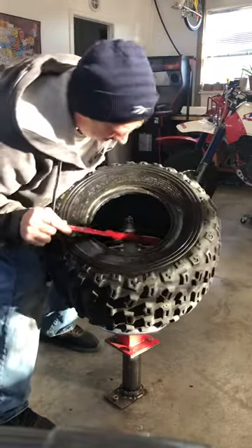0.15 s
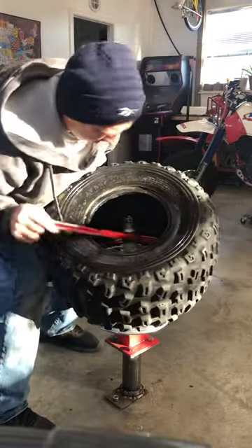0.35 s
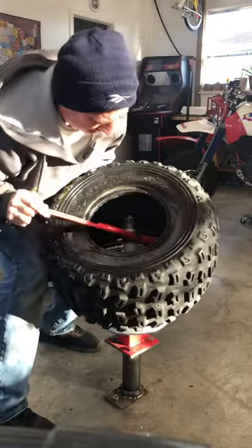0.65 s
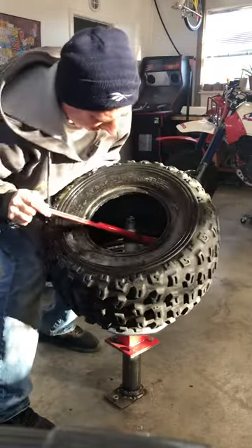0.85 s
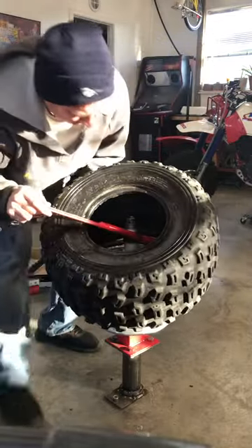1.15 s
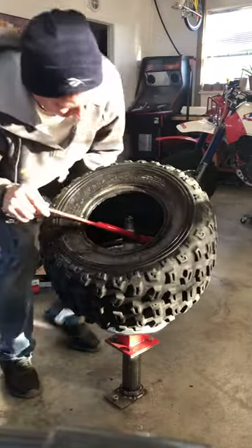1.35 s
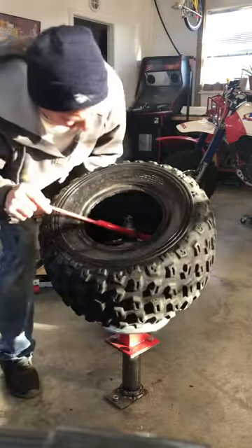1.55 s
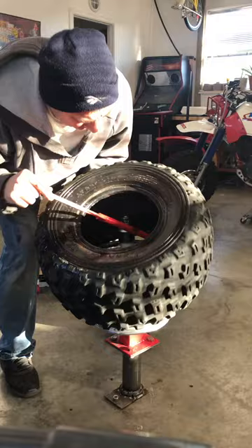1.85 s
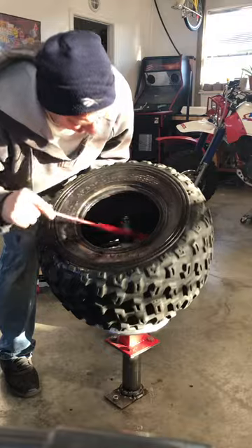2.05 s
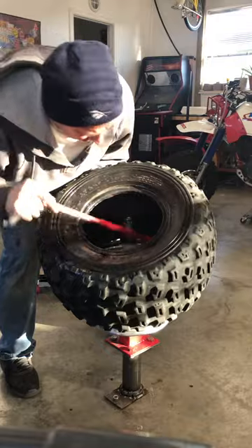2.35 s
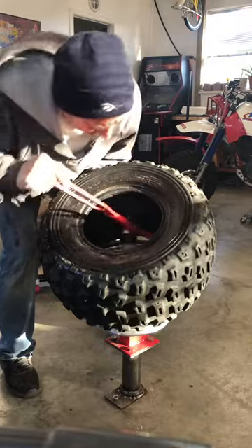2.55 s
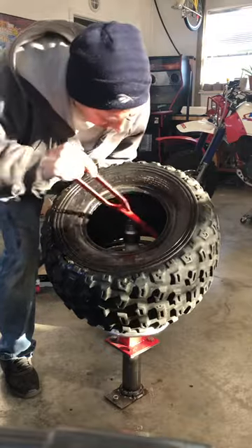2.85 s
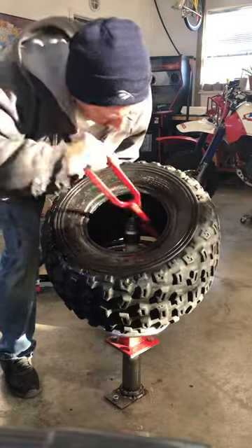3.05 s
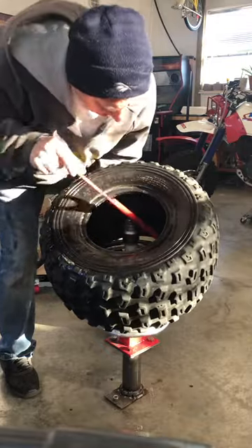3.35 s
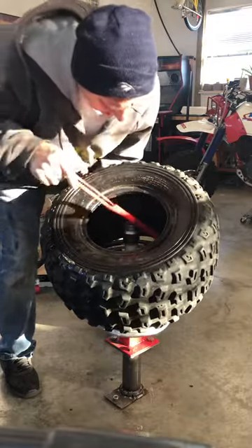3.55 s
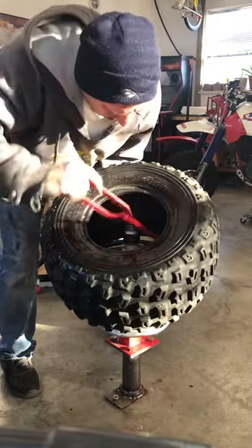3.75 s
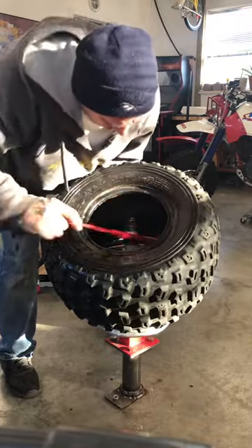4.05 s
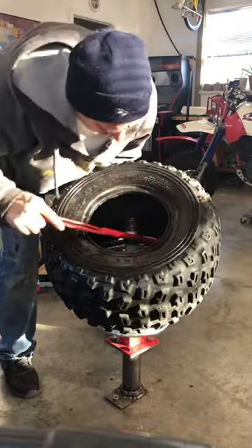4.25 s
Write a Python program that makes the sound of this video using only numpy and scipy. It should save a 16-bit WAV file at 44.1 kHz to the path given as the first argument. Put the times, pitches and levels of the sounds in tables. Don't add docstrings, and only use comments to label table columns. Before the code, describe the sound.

A bar scrapes and rumbles over thick rubber, then dull knocks lead to two hard metallic clangs on a wheel rim in a quiet garage.

```python
import sys
import numpy as np
from scipy import signal
from scipy.fft import rfft, irfft, next_fast_len
from scipy.io import wavfile
from scipy.ndimage import uniform_filter1d

SR = 44100
rng = np.random.default_rng(int(sys.argv[2]) if len(sys.argv) > 2 else 0)


def voltage_ratio(decibels):
    exponent = np.asarray(decibels, float) / 20
    return 10 ** exponent


def to_wav(s):
    ch = np.atleast_2d(s).T
    pcm = np.round(np.clip(ch, -1, 1) * 32767)
    wavfile.write(sys.argv[1], SR, pcm.astype(np.int16))


N = 194920

# (multiple of the shaft rate [1], level [dB rms])
MOTOR_ORDERS = [(1, -59.5), (2, -58), (3, -63.5), (4, -53.5), (5, -76.5)]
SHAFT_HZ = 67.06
# (frequency [Hz], density [dB per Hz])
AIR_SPECTRUM = [(22, -32), (65, -7), (142, -4), (330, -12.5), (640, -22.5), (980, -22.5), (2080, -32),
                (16400, -47)]
AIR_DB = -57
# (frequency [Hz], decay time t60 [s])
GARAGE_DECAY = [(200, 0.23), (1000, 0.31), (3000, 0.54), (8000, 0.22), (16000, .2)]
ROOM_DB = -28

# (frequency [Hz], density [dB per Hz])
CLOTH_SPECTRUM = [(3530, -14.5), (4800, -3), (6530, -8), (7600, -9), (9500, -6), (11400, -7.5), (15200, -8),
                  (16400, -3.5)]
# (time of the peak [s], half length [s], level [dB])
ARM_MOVES = [(.05, 0.18, -69), (.3, 0.13, -59.5), (.42, .15, -57.5), (.6, 0.1, -65.5), (.745, 0.045, -66.5),
             (.86, 0.036, -66), (.915, 0.037, -61), (1.035, 0.046, -52.5), (1.098, 0.037, -43.5),
             (1.135, .02, -54), (1.172, 0.026, -51.5), (1.25, 0.067, -64.5), (1.335, 0.038, -60),
             (1.47, 0.054, -68), (2.02, .06, -72.5), (2.16, 0.16, -67), (2.35, .08, -71), (2.5, .1, -65.5),
             (3.2, .2, -75), (3.348, 0.016, -64), (3.6, 0.048, -73), (4.12, 0.079, -67.5),
             (4.3, 0.17, -68.5)]
# (time [s], level [dB], decay time t60 [s])
SEAM_SNAPS = [
    (0.739, -42, 0.014),
    (1.976, -61, 0.49),
    (2.14, -61, .1),
]
RISE_SHARE = 0.55
SKIRT = 1.3

# (frequency [Hz], density [dB per Hz])
SCRAPE_SPECTRUM = [(180, -23), (320, -10), (512, -7), (676, -23.5), (839, -10.5), (1430, -16.5),
                   (1930, -12), (5000, -38.5)]
HISS_SPECTRUM = [(1410, -44.5), (2400, -1), (3080, -7), (4060, -2.5), (5380, -8.5), (7060, -15), (9000, -6),
                 (12500, -32.5)]
# (time of the peak [s], half length [s], scrape level [dB], hiss over scrape [dB])
RUBBER_STROKES = [(0, 0.07, -57, -25), (0.19, 0.1, -79, 12), (0.266, 0.014, -49.5, -9),
                  (0.306, 0.041, -47, -5), (0.408, 0.12, -59, -2), (0.576, 0.15, -57.5, -4),
                  (0.753, 0.03, -65.5, 6.5), (0.84, 0.031, -63, 1.5), (0.912, 0.042, -60, 5.5),
                  (1.024, 0.052, -60, 3.5), (1.103, 0.045, -56.5, 5), (1.164, 0.026, -61, 13),
                  (1.217, 0.06, -56.5, 0), (1.322, 0.068, -63.5, 0.5), (1.454, 0.094, -62.5, -1),
                  (1.998, 0.051, -69, 3.5), (2.156, 0.092, -63.5, -1), (2.286, 0.032, -64.5, -3)]
# (time of the peak [s], half length [s], level [dB])
WALL_LEANS = [
    (0, 0.065, -33),
    (.09, 0.022, -39.5),
    (.178, 0.036, -46.5),
    (.277, 0.011, -37),
    (.325, 0.029, -35.5),
    (.47, 0.1, -49.5),
    (.61, 0.12, -48),
    (1.215, 0.028, -51),
    (1.93, 0.022, -52),
    (2.27, .02, -54),
]
# (time of the centre [s], half length [s], frequency [Hz], width [Hz], level [dB rms])
RUBBED_MODES = [(0.309, 0.046, 1950, 74, -52), (0.335, 0.036, 680, 22, -61),
                (0.293, 0.031, 3000, 73, -53.5), (0.33, 0.044, 3500, 240, -66),
                (0.42, 0.096, 5000, 390, -59.5), (0.537, 0.037, 1800, 35, -58), (0.57, 0.072, 853, 72, -58),
                (0.5, 0.12, 2300, 50, -85), (0.555, 0.042, 2700, 45, -63), (0.567, 0.066, 1600, 22, -62.5),
                (0.284, .025, 5780, 90, -56), (0.6, 0.09, 5700, 100, -67.5), (0.324, 0.026, 1200, 60, -57),
                (.315, 0.011, 970, 51, -59), (0.513, 0.017, 515, 44, -55.5),
                (1.025, 0.024, 1880, 320, -57.5), (1.04, .025, 7100, 1500, -53),
                (1.105, 0.02, 4500, 970, -50), (1.175, 0.016, 4540, 950, -46.5),
                (.03, 0.035, 5500, 130, -58), (0.065, .025, 3690, 80, -66), (0.057, .03, 4720, 37, -61.5),
                (.05, 0.068, 2830, 37, -65), (0.57, .07, 4800, 64, -67), (0.314, .02, 6950, 40, -58),
                (0.305, 0.045, 3750, 41, -60), (0.46, .05, 4670, 60, -62), (.45, .05, 7680, 50, -68),
                (1.1, .02, 3400, 130, -60), (1.095, 0.014, 6000, 60, -49), (1.17, .025, 4000, 70, -55),
                (1.17, 0.017, 1960, 70, -55.5), (.84, .01, 1000, 80, -61)]

# (time [s], peak level [dB], dull part [dB], sharp part [dB], bright part [dB])
SMALL_CONTACTS = [(0.2586, -43, -3.5, -9, -18), (1.438, -32, -14, -20, -11.5), (1.7055, -55.5, -25, 15, -7),
                  (1.7156, -47, 4.5, -14, -30), (1.7892, -52, -3, -11, -28.5), (1.8933, -51, -8, -10, -27),
                  (2.6562, -57, -1, -21, -20.5), (2.9042, -51.5, -15.5, -0.5, 3.5),
                  (3.163, -56.5, -15, 1, 7), (3.2389, -49, -10, -15, -15), (3.271, -37.5, -12, -25, -1),
                  (3.311, -40, -30, -27, -20), (3.36, -40.5, -25, 1.5, 10), (3.679, -49, -33, -7, 9)]
RUBBER_HZ, STEEL_HZ = 1090, 2710

# (frequency [Hz], decay time t60 [s])
BAR_MODES = [(1485, 1.2), (3999, .47)]
# (time [s], level of the low mode [dB], level of the high mode [dB])
BAR_STRIKES = [
    (1.715, -68, -70),
    (2.311, -45.5, -37.5),
    (3.362, -60.5, -69),
    (3.678, -85, -71),
    (4.145, -56, -38.5),
]
# (frequency [Hz], level [dB], decay time t60 [s])
TIP_MODES = [(1910, -0.5, 0.21), (2960, -6, 0.37), (3900, -3.5, 0.17), (5360, -24, 0.15), (5630, -4, 0.17),
             (6900, -17, 0.34), (7700, -5, 0.17), (9800, -13, 0.25), (10900, -15, 0.2), (12500, -14, 0.064),
             (14000, -2, 0.075)]
# (time [s], level [dB])
TIP_TICKS = [
    (3.164, -65.5),
    (3.225, -58),
    (3.24, -62),
    (3.272, -55.5),
    (3.361, -50),
    (3.678, -57.5),
]
# (time [s], level [dB], frequency [Hz], decay time t60 [s])
BEAD_PATS = [(1.157, -39, 1090, 0.048), (1.187, -40, 380, .025), (1.421, -44, 1000, 0.018),
             (1.4395, -50, 560, .012), (1.637, -61, 5630, .015), (1.68, -50, 600, .02),
             (1.8965, -46, 1050, .04), (1.899, -58, 1900, .03), (1.707, -49, 7000, .02),
             (1.719, -39, 261, .07), (2.318, -48, 65, .12), (3.272, -50, 6950, .03),
             (3.272, -54, 8500, .03), (4.153, -50, 60, .12), (2.3145, -36, 620, 0.042),
             (3.2235, -42, 686, 0.036), (2.3133, -24.5, 475, .012), (2.652, -54, 1100, 0.047),
             (3.2232, -38, 567, .012), (4.1491, -23, 500, .014)]
# (time [s], level [dB], frequency [Hz], decay time t60 [s])
RIM_PINGS = [(3.361, -49, 3031, .22), (3.361, -51, 1879, .17), (3.361, -58, 6912, .18),
             (3.361, -60, 5733, .3), (3.361, -62, 5636, .3), (3.361, -57, 3779, .15),
             (3.224, -56, 1933, .4), (3.224, -54, 1168, .4), (3.224, -54, 845, .4),
             (1.7156, -53, 5240, .08), (2.314, -54, 4813, .4), (2.314, -50, 7370, .29),
             (2.3145, -35, 7506, .07), (4.1493, -43, 3542, .18), (4.1493, -57, 5030, .45),
             (4.1493, -55, 6955, .34), (4.1493, -57, 6915, .3), (4.1493, -58, 8603, .28),
             (4.1493, -53, 7940, .3), (4.1493, -60, 9400, .25), (4.1493, -44, 2592, .33),
             (4.1493, -46, 3368, .34)]

# (frequency [Hz], level [dB], decay time t60 [s])
HOLLOW_MODES = [(164.2, 7, 0.15), (179, 7, 0.15)]
# (time [s], level [dB], damping [divides the modes' t60], wall thud [dB])
HOLLOW_PUSHES = [
    (1.438, -44.5, 0.59, -63),
    (1.719, -30, 1.27, -26.5),
    (1.785, -39.5, 2, -43),
    (1.845, -47, 0.81, -56),
    (1.905, -48, 0.94, -50),
    (2.316, -37.5, 0.44, -30),
    (2.923, -51, 0.86, -69),
    (3.169, -55, 0.67, -63),
    (3.252, -50.5, 0.91, -42),
    (4.152, -40, 0.59, -38),
]

# (frequency [Hz], level [dB], decay time t60 [s])
EARLIER_TAIL = [(338, 6, 0.45), (527, -1.5, 0.56), (1000, -6, 0.53), (1280, -10, 0.4), (2120, -13, 0.39),
                (2640, -13, 0.57), (3770, -21, 0.68), (4940, -15, 0.61), (5100, -17, 0.64),
                (5900, -19, 0.46), (7350, -31, 0.26)]
EARLIER_DB = -44
# (crack [dB], tail [dB], grit [dB], ring time of the tail modes [s], top set by contact softness [Hz])
BLOWS = [
    (-39.5, -47, -38, 0.019, 2100),
    (-28.5, -47.5, -64, 0.013, 2900),
    (-17, -30, -25.5, 0.024, 14000),
    (-28, -47, -33.5, 0.018, 4500),
    (-22.5, -36.5, -21.5, 0.013, 7140),
]
# (time [s], level [dB])
BLOW_TOUCHES = [
    [(1.4313, -2), (1.4328, 0)],
    [(1.7148, -5), (1.7156, 0)],
    [(2.3099, -7), (2.3115, -5), (2.3131, -8), (2.3141, 0), (2.3156, -9)],
    [(3.2205, -10), (3.2220, -3), (3.2232, 0)],
    [(4.1449, -7), (4.1468, -5), (4.1481, -8), (4.1494, 0), (4.1543, -10)],
]
# (frequency [Hz], level [dB], decay time t60 [s])
KNOCK_CRACKS = [
    [(1055, -1.5, 0.051), (1900, -9, 0.028), (2760, -3, 0.033)],
    [(1060, -6.5, 0.029), (2640, -14, 0.071), (5270, -6, 0.027)],
    [(1294, 0, 0.018), (1875, -4, 0.031), (2760, -12, 0.013), (3870, -20, 0.016), (4300, -19, 0.037),
     (5300, -17, 0.081), (7000, -16, 0.012)],
]
# (frequency [Hz], level [dB], decay time t60 [s])
KNOCK_RINGS = [
    [(590, 2.5, 1.3), (1040, -6.5, 0.65), (1460, -30, 1.2), (1960, -12, 0.37), (2320, -18, 0.45),
     (2700, -11, 0.33), (3800, -19, 0.39)],
    [(404, -1.5, .4), (530, -12, 0.27), (716, -18, .4), (1055, -12.5, 0.54), (1870, -18, .4),
     (2250, -11, 0.38), (2680, -9, 0.42), (3740, -20, 0.4), (4610, -18, .3), (5130, -12, 0.31),
     (6900, -16, 0.17), (8500, -27, 0.1)],
    [(850, 3, 0.24), (1284, 4, 0.38), (1790, -20, 0.5), (1950, -3, 0.65), (2440, -8, 0.16),
     (3930, -9.5, 0.7), (4730, -14, .4), (5160, -18, 0.45), (6950, -8, 0.099)],
]
WHEEL_MODE_HZ = [867, 1222, 1470, 1855, 2030, 2135, 2175, 2277, 2450, 2677, 2840, 3385, 3465, 3780]
WHEEL_LEVELS = [
    [-12.5, -24.5, -21.5, -6.5, -11, -5.5, -11, -30, -24, -13.5, -16, -8, -19.5, -15.5],
    [-12, -12.5, -17, -8, -13, -4, -10, -17.5, -5.5, -4.5, -12, -5.5, -16, -5.5],
]
LEVER_MODE_HZ = [3967, 4000, 4130, 4815, 5453, 5728, 5860, 6920, 7500, 7980, 8600, 9400, 11060]
LEVER_LEVELS = [
    [-12, -19, -9.5, -15, -13.5, -14, -22.5, -12, -13.5, -33, -32.5, -27, -21],
    [-19, -11, -8, -14, -16, -11.5, -14, -22, -29, -10.5, -24, -18, -33],
]
# (frequency [Hz], decay time t60 [s])
CLANG_DECAY = [(800, .6), (2000, 0.45), (4000, 0.47), (5000, 0.28), (12000, 0.28)]
CLANG_CRACK_PITCHES = [
    [890, 1437, 1791, 2147, 2677, 2854, 3379, 3843, 4110, 4820, 5573, 7525],
    [728, 1389, 1911, 2154, 2351, 2592, 3497, 4068, 4793, 5900, 7888, 8595],
]
# (level [dB], decay time t60 [s])
CLANG_CRACK_LEVELS = [
    [(-7.5, 0.014), (-2, 0.011), (1.5, 0.026), (3.5, 0.022), (-6, 0.033), (-10.5, 0.05), (-1.5, 0.065),
     (-4, .05), (-6.5, 0.06), (-16.5, 0.076), (-17, 0.05), (-14, 0.087)],
    [(-3, 0.022), (-4, 0.083), (2.5, 0.01), (-3, 0.1), (-21, 0.021), (-4, 0.093), (-0.5, 0.03), (0, 0.079),
     (-6, 0.023), (-8.5, 0.028), (-8, 0.046), (-3.5, 0.0084)],
]
SINGING_PITCHES = [
    [866, 1852, 2075, 2155, 2175, 2677, 3381, 3831, 3966, 4140, 5453, 6891, 7500],
    [867, 1222, 1836, 1903, 2026, 2174, 2273, 2369, 2453, 2677, 3404, 3763, 5841, 8000],
]
# (level [dB], decay time t60 [s])
SINGING_LEVELS = [
    [(-46.5, 0.51), (-39, .45), (-51.5, 0.72), (-40, .37), (-38, 0.44), (-42.5, .4), (-40.5, 0.25),
     (-49, .43), (-36, .44), (-43, .25), (-52, .37), (-48.5, 0.38), (-42, .2)],
    [(-49, 0.51), (-47, 0.38), (-39.5, 0.34), (-47.5, 0.58), (-42, 0.34), (-39, .33), (-46, .37),
     (-46, 0.39), (-39, 0.34), (-43, .33), (-44, 0.34), (-51, 0.46), (-55, .36), (-55, 0.35)],
]
FILL_DB, FILL_RING_S = -10.5, 0.003
TOP_HZ, LOW_CUT_HZ = 16150, 30


def rms_one(x):
    return x / np.sqrt(np.mean(x ** 2) + 1e-20)


def at_hz(points, hz):
    table = np.array(points)
    return np.interp(np.log(hz), np.log(table[:, 0]), table[:, 1])


def band(x, low_hz, high_hz):
    sos = signal.butter(2, [low_hz, min(high_hz, .45 * SR)], "band", fs=SR, output="sos")
    return signal.sosfilt(sos, x)


def add(out, s, sound):
    at = round(s * SR)
    out[at:at + len(sound)] += sound[:N - at]


def drift(rate_hz):
    r = np.exp(-80 * np.pi * rate_hz / SR)
    white = rng.standard_normal(N // 40 + 2002)
    slow = signal.lfilter([1], [1, -2 * r, r * r], white)[2000:]
    return np.interp(np.arange(N) / 40, np.arange(len(slow)), rms_one(slow))


def swells(rows):
    t, out = np.arange(N) / SR, np.zeros(N)
    for s, half, db in rows:
        length = np.where(t < s, RISE_SHARE * half, half)
        out += voltage_ratio(db) * np.exp(-np.abs((t - s) / length) ** SKIRT)
    return out


def noise(spectrum, patchy_db, grain_db):
    grain = np.minimum(rng.exponential(1, (2, N)), 4)
    source = rng.standard_normal((2, N)) * voltage_ratio(grain_db * grain)
    together = drift(14)
    first_hz, last_hz = spectrum[0][0], spectrum[-1][0]
    edges = first_hz * 2 ** np.arange(0, np.log2(last_hz / first_hz) + .3, 1 / 3)
    out = np.zeros(N)
    for k, (low, high) in enumerate(zip(edges, edges[1:])):
        level_db = at_hz(spectrum, np.sqrt(low * high)) + patchy_db * (together + drift(12.0))
        out += voltage_ratio(level_db) * band(source[k % 2], low, high)
    return rms_one(out)


def ring(clicks, hz, t60):
    r, w = voltage_ratio(-60 / (max(t60, .002) * SR)), 2 * np.pi * hz / SR
    return signal.lfilter([0, np.sin(w)], [1, -2 * r * np.cos(w), r * r], clicks + 1e-18)


def strike(clicks, modes, longest):
    return sum((-1) ** k * voltage_ratio(db) * ring(clicks, hz, min(t60, longest))
               for k, (hz, db, t60) in enumerate(modes))


def linger(modes, blur):
    t, out = np.arange(SR) / SR, 0
    for hz, db, t60 in modes:
        t60 = min(t60, 1.6 * at_hz(GARAGE_DECAY, hz))
        feed = rng.standard_normal(SR) * voltage_ratio(-60 * t / t60)
        energy = np.sqrt(t60 / 4 / np.log(1000))
        for ring_s, share_db in (blur, 0), (FILL_RING_S, FILL_DB):
            out = out + voltage_ratio(db + share_db) * rms_one(ring(feed, hz, ring_s)) * energy
    return out


def room_air():
    return voltage_ratio(AIR_DB) * noise(AIR_SPECTRUM, patchy_db=.25, grain_db=0)


def hum():
    phase = 2 * np.pi * np.cumsum(SHAFT_HZ + .25 * drift(1.0)) / SR
    out = np.zeros(N)
    for k, db in MOTOR_ORDERS:
        height = np.sqrt(2) * voltage_ratio(db + .8 * drift(3))
        out += height * np.sin(k * phase + rng.uniform(0, 2 * np.pi))
    return out


def garage(x):
    size = next_fast_len(N + SR)
    hz = np.maximum(np.arange(size // 2 + 1) * SR / size, 1)
    t60, answer = np.maximum(at_hz(GARAGE_DECAY, hz), .05), 0
    for k, lag in enumerate(np.geomspace(.009, .047, num=12)):
        loop = voltage_ratio(-60 * lag / t60) * np.exp(-2j * np.pi * hz * round(lag * SR) / SR)
        answer = answer + (-1) ** k * loop / (1 - loop)
    return irfft(rfft(x, size) * answer, size)[:N]


def sleeves():
    out = swells(ARM_MOVES) * noise(CLOTH_SPECTRUM, patchy_db=1.0, grain_db=4.0)
    t = np.arange(SR // 4) / SR
    for s, db, t60 in SEAM_SNAPS:
        add(out, s, voltage_ratio(db - 60 * t / t60) * band(rng.standard_normal(len(t)), 11800, 16400))
    return out


def rubber_friction():
    scrape = swells([(s, half, db) for s, half, db, over_db in RUBBER_STROKES])
    hiss = swells([(s, half, db + over_db) for s, half, db, over_db in RUBBER_STROKES])
    rough = scrape * noise(SCRAPE_SPECTRUM, patchy_db=1.4, grain_db=3.0)
    return rough + hiss * band(noise(HISS_SPECTRUM, patchy_db=0.4, grain_db=5.0), 2700, 8000)


def rumble():
    hollow = rms_one(band(ring(rng.standard_normal(N), 169.4, 0.16), 120, 190))
    evenness = np.sqrt(uniform_filter1d(hollow ** 2, size=1200) + .1)
    return swells(WALL_LEANS) * hollow / evenness


def rubbed_rim():
    out, t = np.zeros(N), np.arange(2 * SR) / SR
    for s, half, hz, width, db in RUBBED_MODES:
        t60 = np.log(1000) / np.pi / width
        rubbed = rms_one(ring(rng.standard_normal(len(t)), hz, t60))
        rubbed /= np.sqrt(uniform_filter1d(rubbed ** 2, size=900) + .2)
        out[:len(t)] += voltage_ratio(db) * np.exp(-((t - s) / half) ** 2) * rubbed
    return out


def knocks():
    out, t = np.zeros(N), np.arange(SR // 4) / SR
    for s, db, dull_db, sharp_db, bright_db in SMALL_CONTACTS:
        hz = STEEL_HZ if bright_db > dull_db + 10 else RUBBER_HZ
        grit = rng.standard_normal((3, len(t))) * (1 - np.exp(-t / 0.0009))
        sound = .12 * ring(grit[0] * voltage_ratio(-60 * t / .02), hz, .015)
        sound += 0.92 * band(grit[0], 500, 2100) * voltage_ratio(-60 * t / 0.089)
        sound += 9.8 * voltage_ratio(dull_db) * band(grit[1], 180, 597) * voltage_ratio(-60 * t / 0.26)
        sound += 2.0 * voltage_ratio(sharp_db) * band(grit[1], 2100, 5640) * voltage_ratio(-60 * t / 0.054)
        sound += 0.45 * voltage_ratio(bright_db) * band(grit[2], 4100, 16000) * voltage_ratio(-60 * t / 0.076)
        add(out, s, voltage_ratio(db - 3.5) * sound)
    return out


def bar():
    out, click = np.zeros(N), np.eye(1, SR)[0]
    for s, *levels_db in BAR_STRIKES:
        modes = [(hz, db, t60) for (hz, t60), db in zip(BAR_MODES, levels_db)]
        add(out, s, strike(click, modes, 1.5))
    for s, db in TIP_TICKS:
        add(out, s, voltage_ratio(db) * linger(TIP_MODES, blur=.009))
    for s, db, hz, t60 in BEAD_PATS + RIM_PINGS:
        add(out, s, voltage_ratio(db) * band(ring(click, hz, t60), 1.0 * hz, 2.0 * hz))
    return out


def booms():
    out, push, t = np.zeros(N), np.eye(1, SR)[0], np.arange(SR) / SR
    for s, db, damping, thud_db in HOLLOW_PUSHES:
        thud = band(rng.standard_normal(SR), 199.85, 330) * voltage_ratio(-60 * t / 0.81)
        modes = [(hz, level_db, t60 / damping) for hz, level_db, t60 in HOLLOW_MODES]
        add(out, s, voltage_ratio(db) * strike(push, modes, 1) + voltage_ratio(thud_db) * thud)
    return out


def hardest_touch(touches):
    return max(touches, key=lambda touch: touch[1])[0]


def singing():
    out = np.zeros(N)
    for touches, pitches, levels in zip(BLOW_TOUCHES[2::2], SINGING_PITCHES, SINGING_LEVELS):
        modes = [(hz, db, t60) for hz, (db, t60) in zip(pitches, levels)]
        add(out, hardest_touch(touches), strike(np.eye(1, SR)[0], modes, 1))
    return out


def clang_modes(which):
    levels = WHEEL_LEVELS[which] + LEVER_LEVELS[which]
    return [(hz, db, at_hz(CLANG_DECAY, hz)) for hz, db in zip(WHEEL_MODE_HZ + LEVER_MODE_HZ, levels)]


def clang_crack(which):
    return [(hz, db, t60) for hz, (db, t60) in zip(CLANG_CRACK_PITCHES[which], CLANG_CRACK_LEVELS[which])]


def clangs():
    out, tails, t = np.zeros(N), np.zeros(N), np.arange(SR) / SR
    add(tails, 0, voltage_ratio(EARLIER_DB) * linger(EARLIER_TAIL, blur=0.012))
    cracks = [*KNOCK_CRACKS[:2], clang_crack(0), KNOCK_CRACKS[2], clang_crack(1)]
    modes = [*KNOCK_RINGS[:2], clang_modes(0), KNOCK_RINGS[2], clang_modes(1)]
    for blow, touches, crack, rings in zip(BLOWS, BLOW_TOUCHES, cracks, modes):
        crack_db, tail_db, grit_db, blur, top_hz = blow
        start, hardest = touches[0][0], hardest_touch(touches)
        clicks = np.zeros(SR)
        for k, (s, db) in enumerate(touches):
            add(clicks, s - start, [(-1) ** k * voltage_ratio(db)])
        body = strike(clicks, crack, 0.068) + voltage_ratio(5.0) * strike(clicks, crack, 0.0011)
        growth = np.minimum(t / (hardest - start), 1)
        spray = rng.standard_normal(SR) * voltage_ratio(-60 * t / 0.066) * growth
        add(out, start, voltage_ratio(crack_db) * band(body, 530, top_hz) + voltage_ratio(grit_db) * band(spray, 1200, top_hz))
        add(tails, hardest + .003, voltage_ratio(tail_db) * linger(rings, blur))
    return out, tails


def scene():
    background = room_air() + hum() + sleeves()
    friction = rubber_friction() + rumble() + rubbed_rim()
    cracks, tails = clangs()
    blows = cracks + knocks()
    resonances = bar() + booms() + singing()
    return (background + friction + resonances + blows + tails + voltage_ratio(ROOM_DB) * garage(blows))[None]


def roll_off(x):
    return signal.sosfilt(signal.butter(12, 16520, fs=SR, output="sos"), x)


def record(dry):
    cut = signal.sosfilt(signal.cheby2(16, 50, TOP_HZ, fs=SR, output="sos"), dry)
    cut = signal.sosfilt(signal.butter(2, LOW_CUT_HZ, "high", fs=SR, output="sos"), cut)
    return roll_off(cut)


dry = scene()
out = record(dry)
to_wav(out)
```